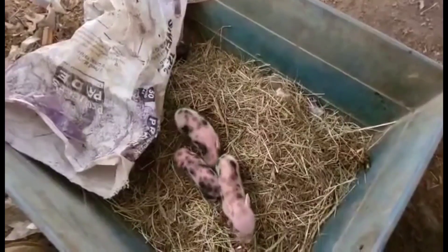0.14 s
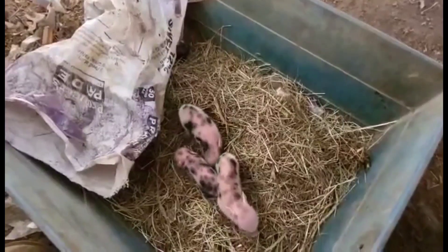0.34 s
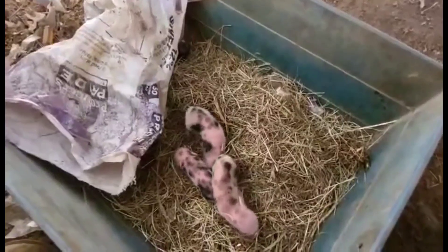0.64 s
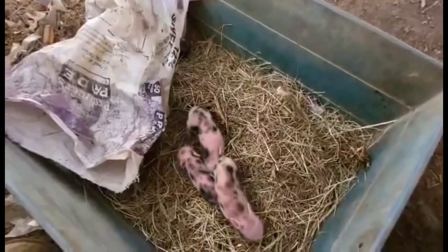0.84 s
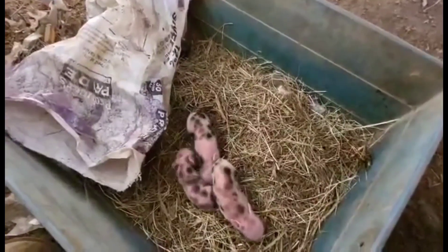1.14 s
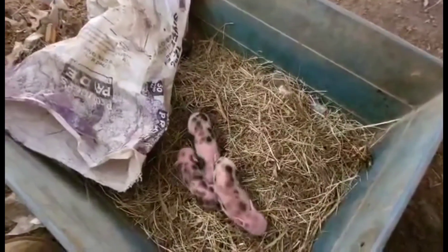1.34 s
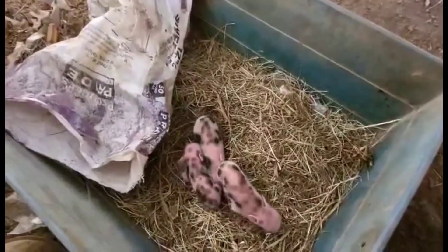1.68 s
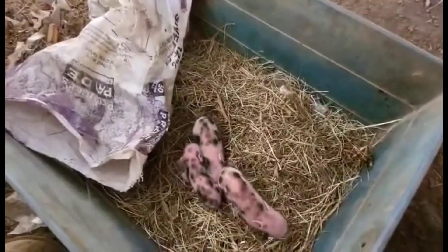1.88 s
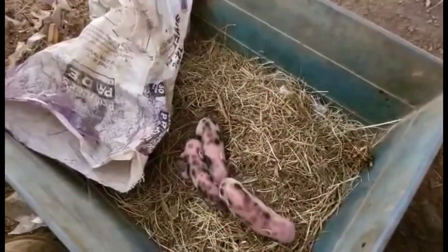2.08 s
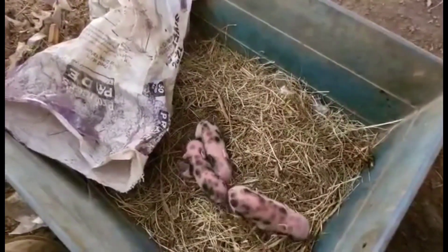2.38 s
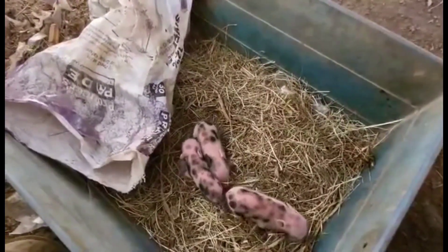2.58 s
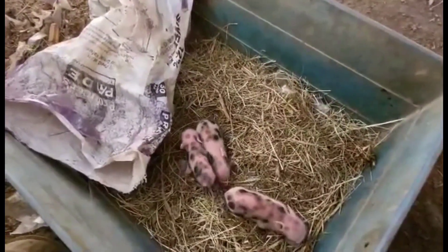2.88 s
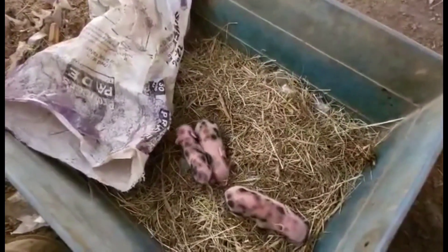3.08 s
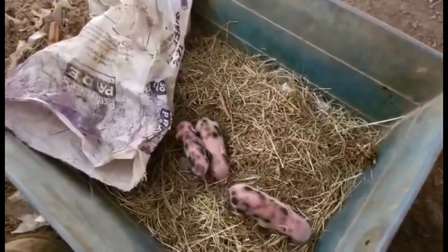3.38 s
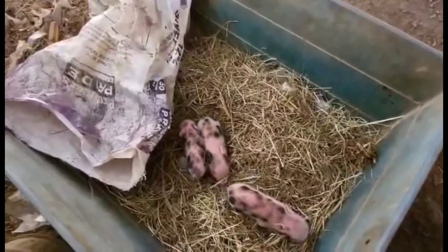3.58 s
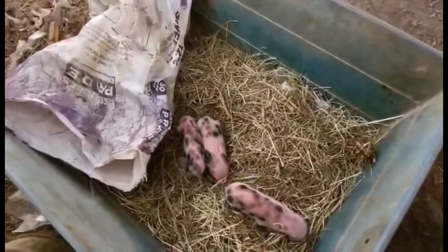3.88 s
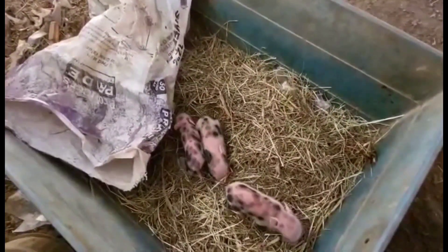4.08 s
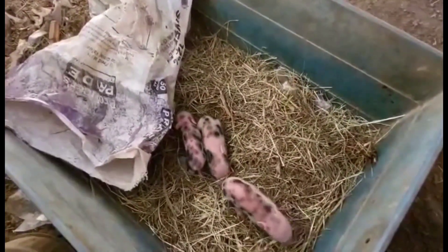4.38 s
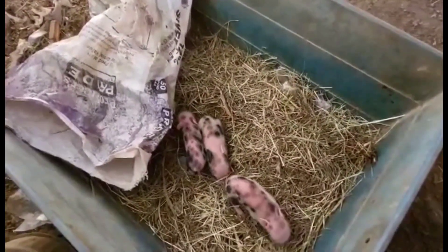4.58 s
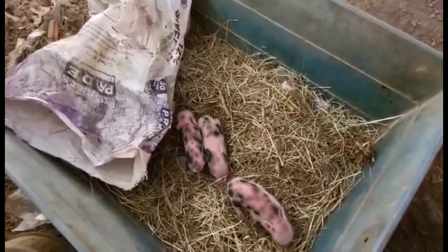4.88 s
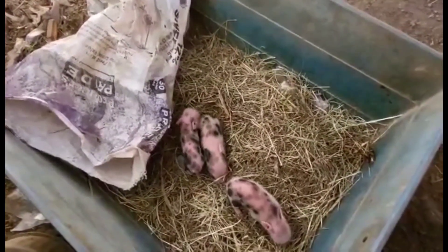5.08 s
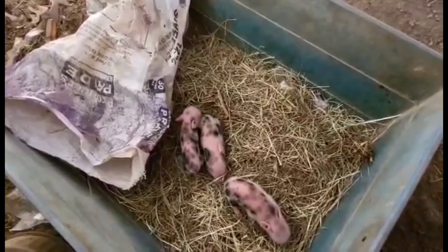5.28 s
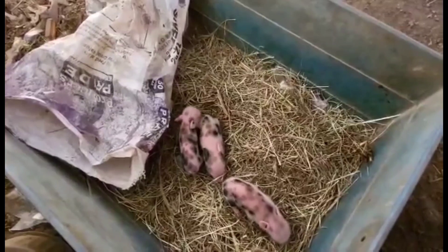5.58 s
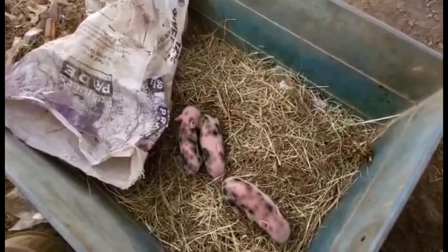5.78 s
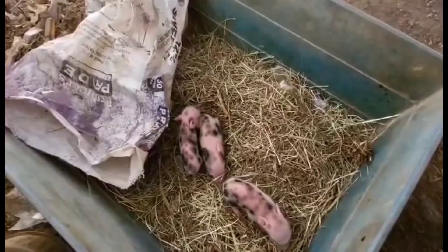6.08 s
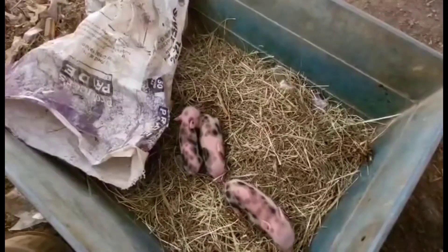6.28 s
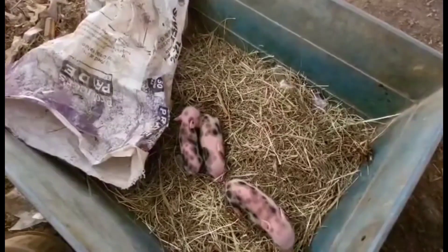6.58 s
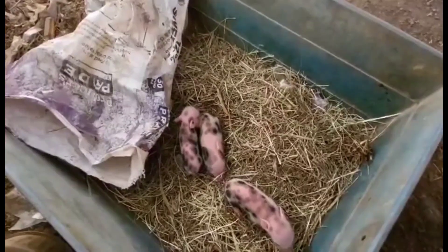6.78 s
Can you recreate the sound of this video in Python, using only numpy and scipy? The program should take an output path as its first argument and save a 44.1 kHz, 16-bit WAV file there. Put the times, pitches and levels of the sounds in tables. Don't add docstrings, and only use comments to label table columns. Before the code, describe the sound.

Close stereo microphones hear tiny piglets in a tub with short, boxy reflections. Straw rustles and paper ticks first, then a dozen hurried yelps open from nasal to raspy, followed by a buzzing held squeal that drops and dies. Trotters knock the wall; eight clearer, downward-sliding yelps with a groan end on the loudest. The litter calms, leaving faint stalk snaps and distant traffic.

```python
import sys
import numpy as np
from scipy import signal
from scipy.fft import rfft, irfft
from scipy.io import wavfile
from scipy.ndimage import uniform_filter1d

SR = 44100
rng = np.random.default_rng(int(sys.argv[2]) if len(sys.argv) > 2 else 0)


def wav_record(signal):
    frames = np.transpose(np.atleast_2d(signal))
    bounded = np.clip(frames, -1, 1)
    quanta = np.round(bounded * 32767).astype(np.int16)
    wavfile.write(sys.argv[1], SR, quanta)


def volts_from_decibels(level):
    exponent = np.asarray(level, float) / 20
    return 10 ** exponent


N = 305912
STEP = 32


def in_time(rows):
    s, *columns = np.transpose(rows)
    return [np.interp(np.arange(N) / SR, s, c) for c in columns]


def smooth(points):
    return np.interp(np.arange(N) / STEP, np.arange(len(points)), points)


def rms_one(x):
    return x / np.sqrt(np.mean(x ** 2) + 1e-20)


def cut(x, hz, kind, order=2):
    return signal.sosfilt(signal.butter(order, hz, kind, fs=SR, output="sos"), x)


def sides(pan_db):
    return volts_from_decibels(np.array([[pan_db / 2], [-pan_db / 2]]))


def drift(rate_hz):
    r = np.exp(-2 * np.pi * rate_hz * STEP / SR)
    noise = rng.standard_normal(N // STEP + 1002)
    return smooth(rms_one(signal.lfilter([1], [1, -2 * r, r * r], noise)[1000:]))


def resonate(x, modes, apart=False):
    out = []
    for k, (hz, width, level_db) in enumerate(modes):
        r = np.exp(-np.pi * width / SR)
        zeros = np.array([1, 0, -1]) * (1 - r * r) / 2
        poles = [1, -2 * r * np.cos(2 * np.pi * hz / SR), r * r]
        out.append((-1) ** k * volts_from_decibels(level_db) * signal.lfilter(zeros, poles, x))
    return out if apart else sum(out)


def swell(start, rise, fall):
    t = np.arange(N // STEP + 1) * STEP / SR - start
    rise, fall = max(rise, .004), max(fall, .004)
    up = np.sin(np.pi / 2 * np.clip(t / rise, 0, 1)) ** 2
    return up * np.exp(-(np.clip(t - rise, 0, 1) / fall) ** 1.5)


# (frequency [Hz], correlation [-1 to 1])
PORT_LIKENESS = [(60, 1), (130, 0.91), (280, 0.72), (610, 0.39), (1320, -0.086), (2870, -0.48),
                 (6210, -0.56), (13400, -0.093)]


def coloured(spectrum, patchy_db):
    hz, level_db = np.transpose(spectrum)
    like_hz, likeness = np.transpose(PORT_LIKENESS)
    edges = hz[0] * 2 ** np.arange(0, np.log2(hz[-1] / hz[0]), 1 / 3)
    out, white, flicker = 0, rng.standard_normal((2, 2, N)), drift(17.0)
    for k, (low, high) in enumerate(zip(edges, edges[1:])):
        mid, side = cut(white[k % 2], [low, high], "band")
        centre = np.log(low * high) / 2
        alike = np.clip(np.interp(centre, np.log(like_hz), likeness), -1, 1)
        gain = volts_from_decibels(np.interp(centre, np.log(hz), level_db) + patchy_db * np.roll(flicker, k * 9001))
        out = out + gain * (np.sqrt(1 + alike) * mid + np.sqrt(1 - alike) * side * [[1], [-1]])
    return rms_one(out)


def hum_of(orders):
    noise = rng.standard_normal(N + SR)
    return rms_one(resonate(resonate(noise, orders), orders)[SR:])


# (time [s], level [dB])
TRAFFIC_LEVEL = [
    (0.0, -52),
    (1.31, -51.5),
    (2.22, -47.5),
    (3.67, -50.5),
    (3.92, -52.5),
    (4.38, -46.5),
    (5.66, -49.5),
    (6.94, -45.5),
]
# (frequency [Hz], level [dB per Hz])
RUMBLE_COLOUR = [(13, -35), (22, -33.5), (33, -9), (48, 11.5), (139, 2), (200, -18.5), (246, -7.5),
                 (285, -14.5), (330, -35), (430, -78), (730, -120)]
# (frequency [Hz], width [Hz], level [dB])
ENGINE_ORDERS = [(56.1, 3.7, -2), (108.34, 14, 1), (148.7, 4, -9.5)]
# (frequency [Hz], width [Hz], level [dB])
DRONE_ORDERS = [(136.7, 11, 0)]


def traffic():
    t = np.arange(N) / SR
    rumble_db, = in_time(TRAFFIC_LEVEL)
    engine_db = -53 + 0.22 * (rumble_db - rumble_db.mean()) + drift(0.24)
    drone_db = -65.5 + 2 * t + 2.5 * drift(0.51)
    rumble = volts_from_decibels(rumble_db + 1.0) * coloured(RUMBLE_COLOUR, patchy_db=2.5)
    machines = volts_from_decibels(engine_db) * hum_of(ENGINE_ORDERS) + volts_from_decibels(drone_db) * hum_of(DRONE_ORDERS)
    return cut(rumble + machines, 30.3, "high")


def wake_db():
    return -10 * np.exp(-np.arange(N) / SR)


# (frequency [Hz], level [dB per Hz])
ROAD_COLOUR = [(120, -71.5), (200, 3.5), (284, -9), (322, 5.5), (347, -10), (552, -0.5), (1640, 0.5),
               (2610, -18.5), (3040, -38), (4000, -16), (5200, -36), (8800, -120)]


def road():
    pass_s, width_s = 2.9, 2.4
    t = np.arange(N) / SR
    road_db = -53.5 - 10 * np.log10(1 + ((t - pass_s) / width_s) ** 2) + wake_db()
    return volts_from_decibels(road_db) * cut(coloured(ROAD_COLOUR, patchy_db=2.0), 2720, "low", order=6)


# (time [s], level [dB])
RESTLESSNESS = [
    (0, -59.5),
    (1.0, -59),
    (3.8, -66.5),
    (6.1, -70.5),
    (6.94, -75.5),
]
# (frequency [Hz], level [dB per Hz])
BED_COLOUR = [(2120, -27.5), (3600, 1), (4750, -1), (6300, 0.5), (11100, -1.5), (12900, -2), (13400, -16),
              (13900, -37)]


def straw_bed():
    bed_db, = in_time(RESTLESSNESS)
    return volts_from_decibels(bed_db + wake_db()) * cut(coloured(BED_COLOUR, patchy_db=3.5), 4260, "high", order=6)


# (time [s], peak level [dB], thud re peak [dB], length [s], left-right [dB])
SHUFFLE_EVENTS = [(0.49, -59.5, 12, 0.056, 3), (0.534, -58, 12, 0.074, 3), (0.64, -60, 11, 0.064, 3),
                  (0.717, -65, 13, 0.12, 1), (0.807, -57, 15.5, 0.07, 2), (1.104, -53, -16, 0.1, 10),
                  (1.193, -33.5, -18, 0.032, 9.5), (1.221, -48, 7, 0.029, -3),
                  (2.412, -41, -1.5, 0.11, 4.5), (2.99, -46, -29.5, 0.06, 29), (3.458, -53.5, -3, 0.069, 8),
                  (3.505, -58, 3, 0.035, -1), (3.628, -44.5, 4.5, 0.044, 4), (3.893, -55, -28, 0.027, 10),
                  (4.107, -53, 12.5, 0.28, 1), (4.98, -45.5, 9, 0.075, 1), (5.154, -63, -4.5, 0.046, 11),
                  (5.265, -69, -23, 0.097, 23), (5.407, -62, -32, 0.058, 10.5),
                  (5.839, -65.5, -16, 0.029, 21), (6.064, -56, 2, 0.046, 3), (6.174, -60.5, -10, 0.038, 6),
                  (6.363, -62.5, -16, 0.047, 12.5)]
# (frequency [Hz], width [Hz], level [dB])
STRAW_MODES = [(5300, 480, 15), (6540, 550, 13), (9630, 1400, 8.5)]
# (frequency [Hz], width [Hz], level [dB])
THUD_MODES = [(400, 180, 0), (1300, 2100, -14.5)]


def shuffles():
    sizes = volts_from_decibels(4.0 * np.minimum(rng.exponential(1, N), 5))
    grains = rng.standard_normal((2, N)) * sizes * (rng.random(N) < 6000 / SR)
    crisp = rms_one(resonate(grains, STRAW_MODES))
    dull = rms_one(resonate(rng.standard_normal((2, N)), THUD_MODES))
    rustle, bump = 0, 0
    for s, db, thud_db, length, pan_db in SHUFFLE_EVENTS:
        shape = volts_from_decibels(db - 9.5) * swell(s - .005, 0.33 * length, length) * sides(pan_db)
        rustle = rustle + shape
        bump = bump + shape * volts_from_decibels(thud_db)
    rustle, bump = ([smooth(side) for side in e] for e in (rustle, bump))
    return rustle * crisp + bump * (dull + 0.35 * dull[::-1])


def cracks(rows, above_hz, decay_s):
    out, t = np.zeros((2, N)), np.arange(300) / SR
    for s, db, pan_db in rows:
        crack = rng.standard_normal(len(t)) * np.exp(-t / decay_s)
        start = round(s * SR)
        out[:, start:start + len(t)] += volts_from_decibels(db - 9.0) * sides(pan_db) * crack
    return cut(out + 1e-18, above_hz, "high")


# (time [s], peak level [dB], left-right [dB])
SNAP_EVENTS = [(1.0949, -57, 14), (1.2433, -34.5, 25), (2.4294, -35, -2), (2.758, -62, 2), (2.5, -48, 2),
               (3.27, -46, 11), (3.6132, -49, 4), (3.633, -33, -6.5), (3.911, -60, 15), (3.9699, -35, -15),
               (3.9885, -59, -2), (4.691, -39, 1), (4.879, -33, 2), (5.435, -49, -3), (5.863, -61, 12.5),
               (6.0726, -55, 7)]
# (frequency [Hz], width [Hz], level [dB])
STALK_MODES = [(2510, 800, -18)]


def snaps():
    clicks = cracks(SNAP_EVENTS, above_hz=1800, decay_s=0.00095)
    return clicks + resonate(clicks, STALK_MODES)


# (time [s], peak level [dB], left-right [dB])
TICK_EVENTS = [(0.2334, -56, 3), (0.4913, -54, 3), (0.7083, -53, 3), (1.0031, -52, 3), (1.1992, -22, 6),
               (1.405, -24, 4), (1.4187, -28, -13), (2.0218, -44, 16), (2.4463, -38, 5), (2.5451, -21, 10),
               (2.7177, -47, 0), (3.7319, -56, 3), (3.8871, -53, 3), (4.2023, -42, 12), (4.9701, -39, 3)]


def sack_ticks():
    return cracks(TICK_EVENTS, above_hz=6940, decay_s=0.00022)


# (time [s], peak level [dB])
KNOCK_EVENTS = [
    (0.505, -52),
    (0.554, -55),
    (0.589, -47),
    (0.819, -53),
    (0.85, -41),
    (1.095, -52),
    (3.632, -31.5),
    (3.655, -29.5),
    (3.684, -50),
    (6.078, -49),
]
# (frequency [Hz], width [Hz], level [dB])
TUB_MODES = [(480, 81, 6), (680, 150, -6.5), (1150, 160, -14)]


def knocks():
    s, db = np.transpose(KNOCK_EVENTS)
    blows = np.zeros(N)
    blows[(s * SR).astype(int)] = volts_from_decibels(db + 27.5)
    return resonate(blows + 1e-18, TUB_MODES)


def even(echo):
    lines = rfft(echo)
    return irfft(lines / np.sqrt(uniform_filter1d(np.abs(lines) ** 2, size=12)), echo.shape[1])


def barn(x):
    t60_s, echo_db, treble_db = .085, 9.5, 10
    t = np.arange(SR // 4) / SR
    decay = volts_from_decibels(-60 * t / t60_s) * (t > .001)
    mid, side = even(rng.standard_normal((2, len(t))) * decay) * (t < 1.5 * t60_s)
    echo = mid + cut(side, 560, "high", order=4) * [[1], [-1]]
    response = volts_from_decibels(echo_db) * echo / np.sqrt(np.sum(mid ** 2) * 2)
    response[0, 0] += 1
    response[1, 12] += 1
    heard = signal.fftconvolve(x[None], response, axes=1)[:, :N]
    left, right = heard / np.sqrt(1 + volts_from_decibels(2 * echo_db))
    tilt = volts_from_decibels(treble_db / 2)
    left = left + (tilt - 1) * cut(left, 3300, "high")
    right = right + (1 / tilt - 1) * cut(right, 3300, "high")
    return np.array([left, right])


def yelps(rows, rise_s, fall_share):
    gaps = np.diff([row[0] for row in rows], append=rows[-1][0] + 0.1)
    shapes = 0
    for (s, db, open_db, hz, lips_db), gap in zip(rows, gaps):
        levels = volts_from_decibels(db - 9.5 + np.array([[0], [open_db], [lips_db]]))
        shapes = shapes + levels * swell(s - .026, rise_s, min(fall_share * gap, 0.061))
    return np.array([smooth(e) for e in shapes])


def drawn_out(rows, lips_db, throb_db=0):
    throb_hz, throb_top_s = 7.8, 2.85
    level_db, open_db = in_time(rows)[:2]
    level_db = level_db + throb_db * np.cos(2 * np.pi * throb_hz * (np.arange(N) / SR - throb_top_s))
    first, last = rows[0][0], rows[-1][0]
    gate, = in_time([(first - .02, 0), (first, 1), (last, 1), (last + .02, 0)])
    spread_db = lips_db + 0.67 * open_db
    return gate * volts_from_decibels([level_db, level_db + open_db, level_db + spread_db])


def folds_of(rows, hoarse, uneven, hum_s, held, glide=0):
    sag_hz_per_s, tail_s = 210, .3
    last = rows[-1]
    out = []
    for s, db, open_db, hz, *yelp in rows + [(last[0] + tail_s, 0, 0, last[3] - sag_hz_per_s * tail_s)]:
        hum = .85 * np.exp(-((s - rows[0][0]) / hum_s) ** 2)
        hum = max(hum, min((435 - hz) / 300, .5))
        rough = hoarse * volts_from_decibels(.5 * open_db) * (1 - .55 * hum)
        slide = glide * (1 - hum) * (s < last[0])
        out.append((s, hz * (1 + slide), rough, uneven * rough, hum))
        if yelp:
            to_next = next((r[0] - s for r in rows if r[0] > s), 1)
            end = s + min(.065, .9 * to_next)
            out.append((end, hz * (1 - slide), held * rough, held * uneven * rough, hum))
    return out


BLOCK = 256


def moving(x, modes, shifts):
    out = np.zeros((len(modes), len(x)))
    for k, (hz, width, level_db) in enumerate(modes):
        r, state = np.exp(-np.pi * width / SR), np.zeros(2)
        b = (-1) ** k * volts_from_decibels(level_db) * np.array([1, 0, -1]) * (1 - r * r) / 2
        for i in range(0, len(x), BLOCK):
            a = [1, -2 * r * np.cos(2 * np.pi * hz * np.exp(shifts[k][i]) / SR), r * r]
            out[k, i:i + BLOCK], state = signal.lfilter(b, a, x[i:i + BLOCK], zi=state)
    return out


def voice(folds, throat, mouth, envelopes):
    rasp, breath, opening_s = 3.5, 2, .005
    span = slice(round((folds[0][0] - .05) * SR), round((folds[-1][0] + .2) * SR))
    pitch, rough, alternate, hum = (c[span] for c in in_time(folds))
    loud, open_mouth, lips = envelopes[:, span]

    push = loud / (uniform_filter1d(loud, SR // 8) + 1e-5)
    jitter = rough * (.11 * drift(30) + .13 * drift(200))[span]
    wobble = .05 * (np.clip(push, 0, 2) - 1.4) + jitter
    cycles = np.cumsum(pitch * np.exp(wobble) / SR)
    closing = np.diff(np.floor(cycles), prepend=0) > 0
    strong_weak = 1 + alternate * (-1) ** np.floor(cycles)
    clumps = volts_from_decibels(4 * rough * drift(100)[span])
    pulses = clumps * closing * strong_weak * np.sqrt(SR / pitch)
    air = clumps * rng.standard_normal(len(pitch)) * np.exp(-3 * (cycles % 1))

    throat_modes = resonate(pulses + rasp * rough * air, throat, apart=True)
    low = sum(mode * volts_from_decibels(2.6 * rough * drift(27)[span]) for mode in throat_modes)
    low = cut(low, 220, "high", order=3)
    nose = 1.7 * np.clip(push, .4, 1.6) * clumps * np.sin(2 * np.pi * cycles)
    low = (1 - hum) * rms_one(low) + hum * nose

    jaw = .025 * drift(7)
    shifts = [np.roll(jaw, k * 1500)[span] for k in range(len(mouth))]
    jet = cut(pulses + breath * (0.15 + rough) * air, [1400, 6800], "band")
    bright = moving(jet, mouth, shifts)
    scale = np.std(sum(bright))
    fill = rms_one(cut(np.roll(jet, BLOCK), [1800, 4900], "band", order=6))
    out = np.zeros(N)
    out[span] = loud * low + volts_from_decibels(-10) * open_mouth * fill
    for k, mode in enumerate(bright):
        follows_lips = 3800 < mouth[k][0] < 8000
        gain = 2 * lips if follows_lips else open_mouth
        wander = volts_from_decibels(1.6 * drift(15)[span])
        out[span] -= np.roll(gain, round(k * opening_s * SR)) * wander * mode / scale
    return out


# (time [s], peak level [dB], mouth opening [dB], pitch [Hz], lip spread [dB])
FIRST_YELPS = [(1.081, -48, -32, 377.8, -23), (1.217, -46, -8, 572, -8.5), (1.356, -37.5, -4, 571, -8.5),
               (1.447, -33.5, 0, 616.7, -6), (1.548, -31, -3, 600, -7), (1.658, -30, -2, 588.3, -5),
               (1.776, -30, -7, 545.3, -6), (1.863, -29, -4, 536.7, -3), (1.973, -28.5, -4.5, 860, -7.5),
               (2.067, -34.5, -2.5, 936, -13), (2.17, -31.5, -3, 770, -1),
               (2.313, -40.5, -4.5, 833.5, -2.5)]
# (frequency [Hz], width [Hz], level [dB])
FIRST_THROAT = [(522, 950, 8.8), (994, 416, 14.1), (1650, 58, 2.5)]
# (frequency [Hz], width [Hz], level [dB])
FIRST_MOUTH = [(2250, 270, 6), (3530, 630, 2), (4750, 650, 1), (5540, 1300, -7.5), (6480, 430, -5.5),
               (12300, 1600, -20)]


def first_yelps():
    folds = folds_of(FIRST_YELPS, hoarse=.7, uneven=.35, hum_s=.38, held=.65, glide=.025)
    return voice(folds, FIRST_THROAT, FIRST_MOUTH, yelps(FIRST_YELPS, .04, 0.51))


# (time [s], level [dB], mouth opening [dB], pitch [Hz])
LONG_SQUEAL = [
    (2.35, -51.5, -19.5, 430),
    (2.42, -41.5, -15.5, 480),
    (2.49, -37.5, -3.5, 430),
    (2.6, -34, -4, 445.2),
    (2.84, -34.5, -1.5, 449.5),
    (3.15, -34, -5, 440),
    (3.29, -36.5, -3, 349.2),
    (3.37, -42, -16, 324.2),
    (3.48, -66.5, -24, 316),
]
# (frequency [Hz], width [Hz], level [dB])
SQUEAL_THROAT = [(468, 166, -4), (629, 212, 0), (860, 204, -3.5), (1420, 210, -13)]
# (frequency [Hz], width [Hz], level [dB])
SQUEAL_MOUTH = [(1713, 120, -5), (2150, 230, 0), (2695, 132, 2), (3314, 335, -6.5), (4290, 223, -7),
                (4780, 150, -9.5), (5280, 45, -28), (12020, 620, -32.5)]


def long_squeal():
    folds = folds_of(LONG_SQUEAL, hoarse=.75, uneven=1.2, hum_s=.15, held=1)
    return voice(folds, SQUEAL_THROAT, SQUEAL_MOUTH, drawn_out(LONG_SQUEAL, lips_db=-10.5, throb_db=2.2))


# (time [s], peak level [dB], mouth opening [dB], pitch [Hz], lip spread [dB])
SECOND_YELPS = [
    (4.124, -35.5, -9, 425, -17.5),
    (4.232, -27, -1.5, 411.9, -33),
    (4.33, -28.5, 1.5, 446.5, -32),
    (4.458, -26.5, 1, 444.6, -28),
    (4.571, -27, 2.5, 419.5, -16),
    (4.692, -29.5, 1, 432.5, -17),
    (4.722, -30, 0.5, 430, -17),
    (4.842, -22, -5.5, 385.4, -25),
]
# (time [s], level [dB], mouth opening [dB])
GROAN_LEVEL = [
    (4.22, -57, -41),
    (4.3, -48.5, 4),
    (4.93, -45, 0.5),
    (5.05, -50, -13.5),
    (5.14, -58, -33),
]
# (frequency [Hz], width [Hz], level [dB])
SECOND_THROAT = [(430, 183, -0.5), (777, 172, 4), (1417, 128, -9)]
# (frequency [Hz], width [Hz], level [dB])
SECOND_MOUTH = [(2090, 90, 3.5), (2700, 140, -3.5), (2950, 120, -0.5), (3453, 90, -2.5), (4350, 830, -3),
                (5160, 160, -10), (11860, 1200, -21)]


def second_yelps():
    folds = folds_of(SECOND_YELPS, hoarse=.5, uneven=.3, hum_s=.1, held=.8, glide=.06)
    push = yelps(SECOND_YELPS, .042, .36) + drawn_out(GROAN_LEVEL, lips_db=-9)
    return voice(folds, SECOND_THROAT, SECOND_MOUTH, push)


def piglets():
    cries = volts_from_decibels(5) * (first_yelps() + long_squeal() + second_yelps())
    turn = np.pi / 4 + .7 * drift(7)
    return sides(1) * (barn(cries * np.cos(turn)) + barn(cries * np.sin(turn)))


def scene():
    yard = traffic() + road() + straw_bed()
    litter = shuffles() + snaps() + sack_ticks() + knocks()
    return yard + litter + piglets()


def thinned(x):
    from_hz = 3300
    hz, _, z = signal.stft(x, SR, nperseg=2048)
    power = np.abs(z) ** 2
    loud_db = 10 * np.log10(power[:, hz > 300].sum(axis=(0, 1)) + 1e-12)
    patches = rng.standard_normal((65, z.shape[2] // 2 + 1))
    patches = np.repeat(np.repeat(patches, 16, axis=0), 2, axis=1)[:len(hz), :z.shape[2]]
    treble_db = 2.5 * np.log2(1 + hz / from_hz)[:, None]
    bar_db = -3 + .25 * (loud_db - loud_db.max()) + 5 * patches + treble_db
    strong = power > uniform_filter1d(power, size=24, axis=1) * volts_from_decibels(2 * bar_db)
    keep = strong | (hz < from_hz)[:, None]
    return signal.istft(z * keep, SR, nperseg=2048)[1][:, :N]


def top_cut(x):
    return signal.sosfilt(signal.butter(12, 14050, fs=SR, output="sos"), x)


def record(dry):
    steep = signal.cheby2(10, 60, 14150, fs=SR, output="sos")
    mix = signal.sosfilt(steep, thinned(dry))
    return top_cut(mix)


dry = scene()
out = record(dry)
wav_record(out)
```